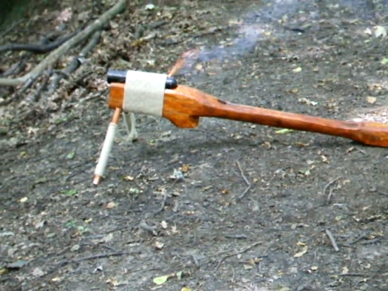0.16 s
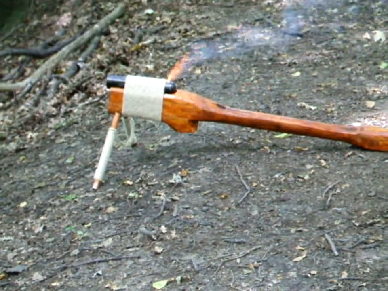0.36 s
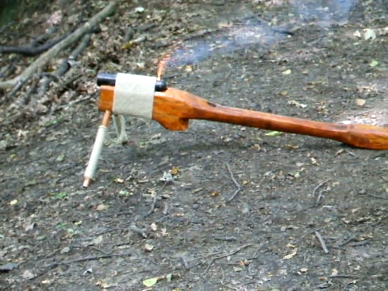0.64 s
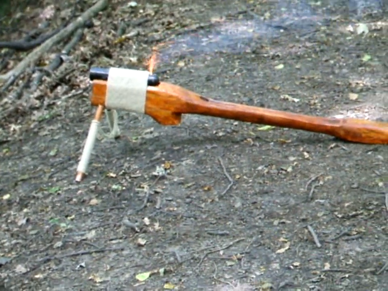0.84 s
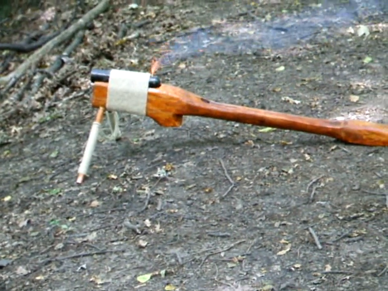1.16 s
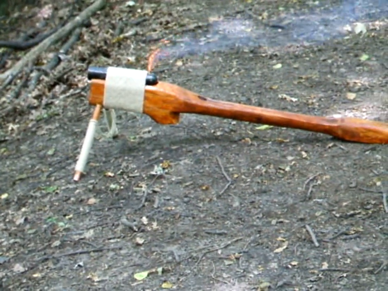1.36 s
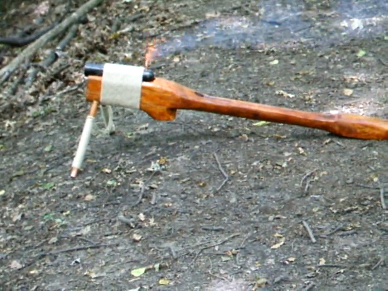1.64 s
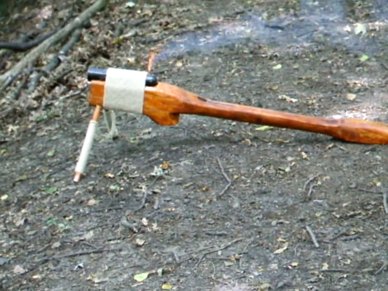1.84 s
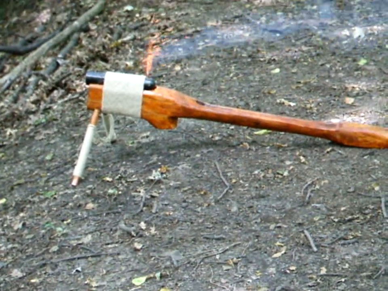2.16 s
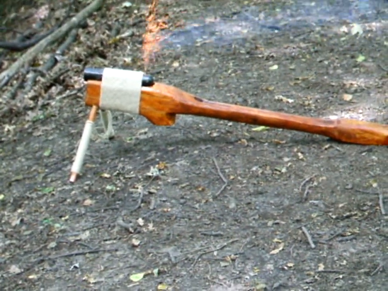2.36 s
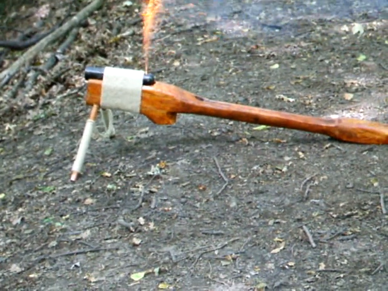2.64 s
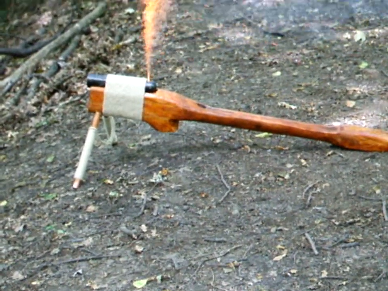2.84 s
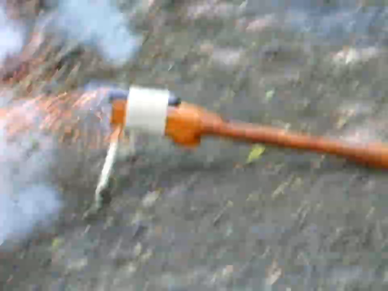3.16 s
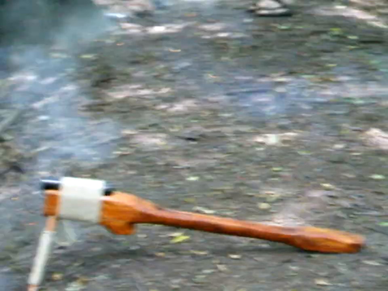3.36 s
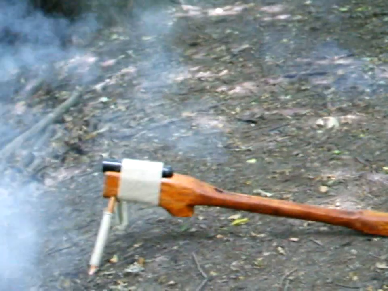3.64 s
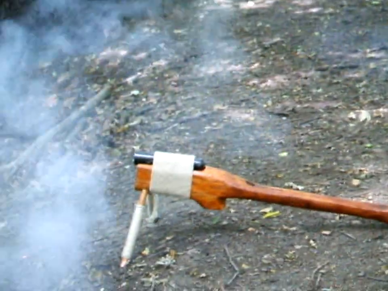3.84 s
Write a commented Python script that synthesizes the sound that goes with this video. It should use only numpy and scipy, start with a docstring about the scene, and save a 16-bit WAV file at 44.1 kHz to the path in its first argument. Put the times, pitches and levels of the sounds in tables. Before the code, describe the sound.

Close mono pickup on a forest path: quiet spitting fuse fizz over a soft woodland bed, swelling quickly to a harsh flame roar, then a small cannon's cracking, thumping shot clips the microphone and echoes among trees.

```python
"""A fuse sputters on a small cannon on a forest path, then a jet of flame roars until the charge fires.
The flame is filtered noise with sparks, moving from thin fizz to full jet; struck modes knock and snap.
Nearby surfaces scatter flame, knocks and snaps, over a soft woodland bed with two faint tones.
The blast stacks a crack, a low thump, a near burst and echoing woods; it overloads the microphone,
and gain control ducks and recovers."""
import sys
import numpy as np
from scipy import signal
from scipy.io import wavfile
from scipy.ndimage import uniform_filter1d

SR = 44100
rng = np.random.default_rng(int(sys.argv[2]) if len(sys.argv) > 2 else 0)


def materialize(psi):
    """Save the field psi as 16-bit PCM at rate SR to the path in sys.argv[1].

    A 1-D psi becomes a single channel; in a 2-D psi each row is a channel.
    """
    bounded = np.clip(np.atleast_2d(psi).T, -1, 1)
    quanta = np.round(bounded * 32767).astype(np.int16)
    wavfile.write(sys.argv[1], SR, quanta)


def ratio(d):
    """dB to gain"""
    e = np.asarray(d, float) / 20
    return 10 ** e


N = 176400  # samples, 4 s

# Course of the flame: (time [s], level of the upper hiss [dB], lower hiss against it [dB])
FLAME_COURSE = [(0, -34, -4.5), (.23, -38.5, -4), (.27, -33.5, -5), (.35, -31.5, -7), (.45, -33.5, -5.5),
                (.63, -33.5, -5.5), (.8, -33, -4), (.94, -32.5, -7.5), (.97, -32, -2.5),
                (1.03, -31.5, -6.5), (1.16, -36.5, -4.5), (1.6, -35.5, -6.5), (1.98, -35, -7.5),
                (2.13, -37, -7), (2.2, -36, -8), (2.27, -35, -7.5), (2.43, -34.5, -8), (2.5, -31, -10),
                (2.77, -23.5, -12.5), (2.91, -20, -8.5), (2.94, -18.5, -6), (2.97, -17, -7),
                (3.02, -21, -5.5), (3.075, -17, -5), (3.087, -21, -6), (3.111, -20, -5.5),
                (3.125, -13, -3.5), (3.14, -19, -4), (3.19, -14, -9.5), (3.22, -20, -12.5)]
# Thin fizz of the fuse: (frequency [Hz], density [dB per Hz])
FUSE_FIZZ = [(1300, -44), (2560, -11), (2800, -5), (3900, -2.5), (4420, -10.5), (4750, -3.5), (5410, -0.5),
             (6400, -7), (7290, -1.5), (8740, -7.5), (9800, -17), (10700, -17), (11600, -31.5),
             (12300, -32), (13700, -47), (15700, -43)]
# Full jet of flame: (frequency [Hz], density [dB per Hz])
JET_HISS = [(1300, -35.5), (2500, -4.5), (3010, -3.5), (3400, 3), (3900, 0.5), (4420, -8.5), (4680, -1.5),
            (5300, 2.5), (5990, -5.5), (7340, 0.5), (7960, -7.5), (8940, -4.5), (9890, -19), (10700, -15),
            (11600, -29.5), (12300, -29), (13200, -43), (14100, -50), (15700, -42)]
# Lower hiss of the fuse: (frequency [Hz], density [dB per Hz])
FUSE_LOW_HISS = [(240, -27), (400, -6), (429, -17), (456, -11), (605, 3), (756, 1), (822, 2), (2500, -2),
                 (3250, -5.5), (5500, -120)]
# Lower roar of the jet: (frequency [Hz], density [dB per Hz])
JET_LOW_ROAR = [(60, -62), (125, -23), (183, -5.5), (364, -11.5), (477, -23), (633, -6.5), (948, -14),
                (1070, -9), (1420, -2), (1670, -7), (2070, 2), (2500, -11.5), (3250, -30), (5500, -120)]
# Steady bed of the woods: (frequency [Hz], density [dB per Hz])
WOODS_SPECTRUM = [(15, -37), (25, 0), (107, -6), (167, -6), (216, -5), (415, -4.5), (460, -5.5),
                  (605, -8.5), (1500, -12), (1950, -13), (3300, -120)]
# Dull knocks: (time [s], peak [dB])
KNOCK_EVENTS = [(0.652, -23), (0.695, -19), (0.705, -26), (0.712, -18), (0.722, -23), (0.734, -15),
                (0.753, -24), (0.982, -26), (0.994, -28)]
# Resonances of a knock: (frequency [Hz], level [dB], T60 [s])
KNOCK_RESONANCES = [(580, -16, 0.017), (696, 5.5, 0.023), (814, 6, 0.028), (1050, -1, .012),
                    (1204, 8, 0.03), (1480, 4, 0.012), (2000, -4, 0.008), (3740, 1, 0.016)]
# Faint tones, perhaps birds: (time [s], length [s], frequency [Hz], peak [dB])
CHIRP_EVENTS = [(0.88, 0.047, 1056, -37.5), (1.54, 0.073, 4010, -42)]
# Sharp snaps: (time [s], peak [dB])
SNAP_EVENTS = [(1.0259, -9.5), (1.0335, -23), (1.0538, -21), (1.469, -28), (2.6512, -16)]
# Resonances of a snap: (frequency [Hz], level [dB], T60 [s])
SNAP_RESONANCES = [(1980, -4, 0.012), (2490, 5, 0.0043), (2960, -5, 0.0099), (4480, 1, 0.0063),
                   (6000, -10, .008)]
# Muzzle crack: (frequency [Hz], density [dB per Hz])
CRACK_SPECTRUM = [(150, -32), (500, 5), (1750, 0.5), (3800, -2.5), (6700, -7), (12500, -70), (22000, -120)]
# Burst from the ground and first trunks: (frequency [Hz], density [dB per Hz])
NEAR_SPECTRUM = [(150, -26), (400, -3), (700, -2.5), (1000, -6.5), (3000, -9), (6000, -11), (9600, -18),
                 (12500, -48), (22000, -100)]
# Low thump: (frequency [Hz], density [dB per Hz])
THUMP_SPECTRUM = [(30, -29), (55, -3), (80, 2), (120, -4), (170, -1.5), (230, -5.5), (350, -12.5),
                  (700, -59), (22000, -120)]
# Deep woods: (frequency [Hz], density [dB per Hz])
FAR_SPECTRUM = [(18, -42), (30, 5), (100, 8.5), (171, -5), (330, -3), (450, -7.5), (668, -6.5),
                (839, -10.5), (1900, -11), (6000, -8.5), (7400, -16.5), (8050, -21.5), (8700, -18),
                (10200, -21), (12500, -32), (16200, -71), (22000, -120)]
# Decay of the deep woods: (frequency [Hz], T60 [s])
FAR_DECAY = [(60, 0.94), (150, 1.48), (350, 2.35), (800, 2.49), (2000, 2.01), (5000, 1.164), (10000, 1.023)]
# Slow swing of the overloaded microphone: (time after overload [s], displacement [share of full scale])
CAPSULE_SWING = [(-.002, 0), (.0065, -.9), (.021, -.78), (.046, -.5), (.05, .2), (.064, .15), (.067, .75),
                 (.083, .7), (.095, .2), (.115, -.03), (.16, 0)]

JET_FROM_DB, JET_FULL_DB = -35, -21  # flame levels between which the fizz turns into the jet
SPARKS_PER_S, SPARK_SPREAD_DB = 1100, 4
SPARKS_DB, JET_SPARKS_DB = -12.5, 7.5  # sparks against the gas in the fizz; their gain in the full jet
SPUTTER_DB, SPUTTER_S = 1, 0.0015  # fast unrest of the gas: rms depth, smoothing
FLICKER_DB, FLICKER_S = 1, 0.02  # slower unrest of gas and sparks: rms depth, smoothing
BOUNCES_PER_S, BOUNCE_DB, BOUNCE_T60_S = 1500, -13, 0.051
WOODS_DB, WOODS_SWAY_DB, WOODS_SWAY_S = -45.5, 0.8, 0.08
SHOT_S = 3.2252
SHOT_RISE_S = 0.00086  # shared onset of crack, near burst and thump
CRACK_DB, CRACK_S = 30, 0.005
NEAR_DB, NEAR_S = 17.5, 0.072
THUMP_DB, THUMP_T60_S, THUMP_RISE_S = 20.5, 0.57, 0.0033
FAR_DB, FAR_BUILD_S = 19.5, 0.15
CEILING_DB, GRAB_S, RECOVER_DB_PER_S = -6.5, 0.0012, 48.5  # gain control
OVERLOAD_DB = 6  # level that sets the capsule swinging
OFFSET, FULL_SCALE = -0.0069, 0.97  # steady offset of the converter; clipping point


def evened(x):
    """Scales to rms 1."""
    return x / np.sqrt(np.mean(x ** 2) + 1e-20)


def read(points, hz):
    """Reads a table on a log-frequency axis."""
    f, value = np.transpose(points)
    return np.interp(np.log(hz + 1), np.log(f + 1), value)


def colour(x, spectrum):
    """Filters with the minimum-phase response of a spectrum table; unit power for white input."""
    hz = abs(np.fft.fftfreq(8192, 1 / SR))
    log_gain = np.log(ratio(np.maximum(read(spectrum, hz), -100)))
    # The Hilbert transform of the log gain gives the phase of a causal filter
    response = np.exp(np.conj(signal.hilbert(log_gain)))
    taps = np.fft.ifft(response).real[:4096]
    return signal.oaconvolve(x, taps / np.linalg.norm(taps))[:len(x)]


def wander(seconds):
    """Twice-smoothed noise of rms 1, for slow random movement."""
    size = max(int(seconds * SR), 2)
    smooth = uniform_filter1d(rng.standard_normal(N), size)
    return evened(uniform_filter1d(smooth, size))


def hits(events, modes):
    """Each blow rings decaying sine modes, with level and pitch varied slightly from blow to blow."""
    out, t = np.zeros(N), np.arange(3000) / SR
    for s, peak_db in events:
        ring = np.zeros(len(t))
        for hz, mode_db, t60 in modes:
            level_chance, pitch_chance = rng.uniform(-1, 1, 2)
            envelope = ratio(mode_db + 1.4 * level_chance - 60 * t / t60)
            ring += envelope * np.sin(2 * np.pi * hz * (1 + 0.087 * pitch_chance) * t)
        ring *= np.minimum(t / 0.0004, 1)  # soft onset [s]
        out[round(s * SR):][:len(t)] += ratio(peak_db) * ring / abs(ring).max()
    return out


def flame_drive(jet):
    """Uneven gas noise and random spark clicks flicker together; sparks gain weight with the jet."""
    sparking = rng.random(N) < SPARKS_PER_S / SR
    spark_size = ratio(SPARK_SPREAD_DB * np.minimum(rng.exponential(1, N), 4))
    gas = evened(rng.standard_normal(N) * ratio(SPUTTER_DB * wander(SPUTTER_S)))
    sparks = evened(sparking * spark_size * rng.choice([-1, 1], N))
    mix = gas + ratio(SPARKS_DB + JET_SPARKS_DB * jet) * sparks
    return mix * ratio(FLICKER_DB * wander(FLICKER_S))


def flame():
    """Gas noise and sparks whose colour moves from fizz to jet as the flame grows, until the shot."""
    t = np.arange(N) / SR
    s, level_db, low_db = np.transpose(FLAME_COURSE)
    level_db, low_db = np.interp(t, s, level_db), np.interp(t, s, low_db)
    jet = np.clip((level_db - JET_FROM_DB) / (JET_FULL_DB - JET_FROM_DB), 0, 1)
    drive = flame_drive(jet)
    fuse_share, jet_share = np.cos(jet * np.pi / 2), np.sin(jet * np.pi / 2)
    high = fuse_share * colour(drive, FUSE_FIZZ) + jet_share * colour(drive, JET_HISS)
    low = fuse_share * colour(drive, FUSE_LOW_HISS) + jet_share * colour(drive, JET_LOW_ROAR)
    # Both colours share one drive, so the crossfade needs evening out
    overlap = np.sqrt(1 + 2 * fuse_share * jet_share)
    return (high + ratio(low_db) * low) / overlap * ratio(level_db) * (t < SHOT_S)


def bounces(x):
    """Stones, wood and trunks close by add a short, decaying scatter of reflections."""
    t = np.arange(4000) / SR
    taps = (rng.random(len(t)) < BOUNCES_PER_S / SR) * rng.choice([-1, 1], len(t))
    taps = taps * ratio(-60 * t / BOUNCE_T60_S) * (t > 0.002)  # none in the first 2 ms
    return x + ratio(BOUNCE_DB) * signal.oaconvolve(x, taps / np.linalg.norm(taps))[:N]


def woods():
    """A soft bed of coloured noise that sways slightly in level."""
    sway = ratio(WOODS_DB + WOODS_SWAY_DB * wander(WOODS_SWAY_S))
    return sway * colour(rng.standard_normal(N), WOODS_SPECTRUM)


def knocks():
    """Dull blows ring low, short-lived modes."""
    return hits(KNOCK_EVENTS, KNOCK_RESONANCES)


def chirps():
    """Short soft whistles: steady sines under half-sine envelopes."""
    t, out = np.arange(N) / SR, np.zeros(N)
    for s, length, hz, db in CHIRP_EVENTS:
        envelope = np.sin(np.pi * np.clip((t - s) / length, 0, 1))
        out += ratio(db) * envelope * np.sin(2 * np.pi * hz * t)
    return out


def snaps():
    """Sharp blows ring higher modes that die within milliseconds."""
    return hits(SNAP_EVENTS, SNAP_RESONANCES)


def muzzle_crack(t):
    """A bright noise pulse under a bell-shaped fall."""
    return ratio(CRACK_DB) * colour(rng.standard_normal(SR), CRACK_SPECTRUM) * np.exp(-(t / CRACK_S) ** 2)


def near_burst(t):
    """Dense noise from the ground and first trunks holds briefly, then drops away."""
    return ratio(NEAR_DB) * colour(rng.standard_normal(SR), NEAR_SPECTRUM) * np.exp(-(t / NEAR_S) ** 4)


def thump(t):
    """Low noise with a quick rise and an exponential decay."""
    rumble = colour(rng.standard_normal(2 * SR), THUMP_SPECTRUM)[SR:]  # skip the filter's build-up
    return ratio(THUMP_DB - 60 * t / THUMP_T60_S) * rumble * np.minimum(t / THUMP_RISE_S, 1)


def forest_echo():
    """Scattered echoes from the trees: patchy noise, each band dying at its own speed."""
    hz, t, z = signal.stft(colour(rng.standard_normal(SR), FAR_SPECTRUM), SR, nperseg=512)
    patches = uniform_filter1d(rng.standard_normal(z.shape), 6, 0)  # across frequency
    patches = evened(uniform_filter1d(patches, 10, 1))  # across time
    gain_db = 1.2 * patches - 60 * t / read(FAR_DECAY, hz)[:, None]
    return signal.istft(z * ratio(gain_db), SR, nperseg=512)[1][:SR]


def blast():
    """Crack, near burst and thump share one fast onset, while the deep woods build up behind."""
    t, out = np.arange(SR) / SR, np.zeros(N + SR)
    rise = np.sin(np.pi / 2 * np.minimum(t / SHOT_RISE_S, 1)) ** 2
    close = rise * (muzzle_crack(t) + near_burst(t) + thump(t))
    far = ratio(FAR_DB) * forest_echo() * (1 - np.exp(-t / FAR_BUILD_S))
    out[round(SHOT_S * SR):][:SR] = close + far
    return out[:N]


def scene():
    """All sources, mono; flame, knocks and snaps get the close reflections."""
    bed = woods()
    close = bounces(flame() + knocks() + snaps())
    return (close + bed + chirps() + blast())[None]


def top_cut(x):
    """Nothing passes above the cut-off."""
    return signal.sosfilt(signal.butter(12, 15730, fs=SR, output="sos"), x)


def record(dry):
    """Gain control grabs the blast and lets go steadily; the overload swings the capsule; peaks clip."""
    x, t = dry[0], np.arange(N) / SR
    size = max(int(GRAB_S * SR), 2)
    power_db = 10 * np.log10(abs(uniform_filter1d(x ** 2, size)) + 1e-12)
    # Peak hold that falls at a constant rate in dB
    fall_db = RECOVER_DB_PER_S * t
    held_db = np.maximum.accumulate(power_db + fall_db) - fall_db
    over_db = np.maximum(held_db - CEILING_DB, 0)
    ducked = x / ratio(uniform_filter1d(over_db, size))
    overload_s = t[np.argmax(abs(x) > ratio(OVERLOAD_DB))]
    swing = np.interp(t - overload_s, *np.transpose(CAPSULE_SWING))
    mix = np.clip(ducked + swing + OFFSET, -FULL_SCALE, FULL_SCALE)
    return top_cut(mix[None])


dry = scene()
out = record(dry)
materialize(out)
```